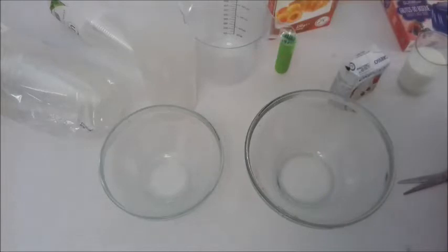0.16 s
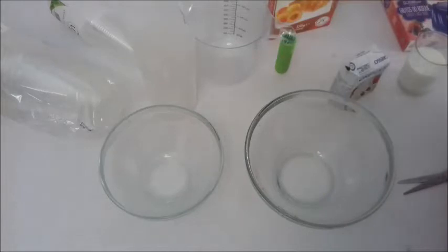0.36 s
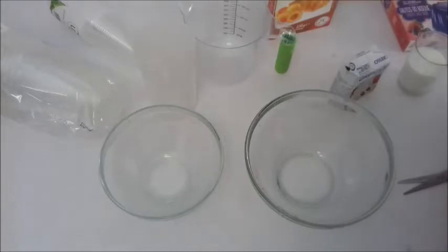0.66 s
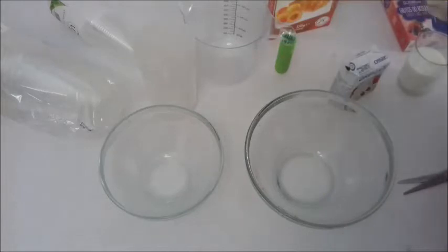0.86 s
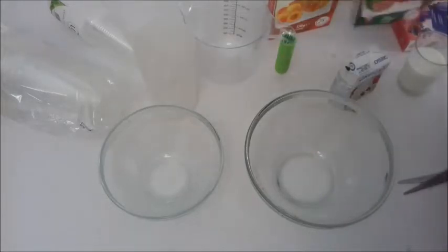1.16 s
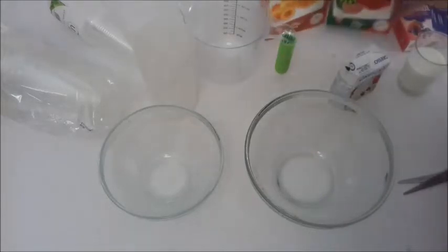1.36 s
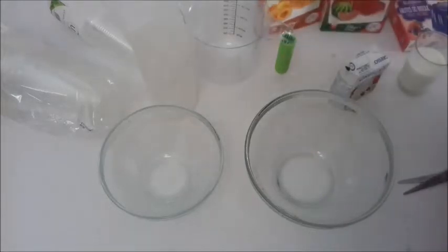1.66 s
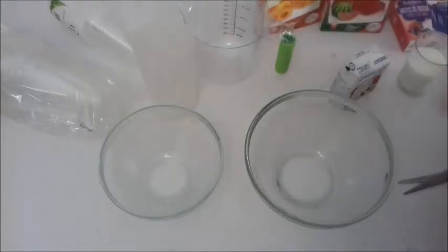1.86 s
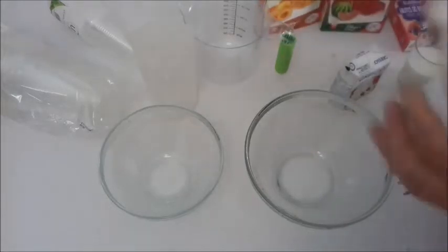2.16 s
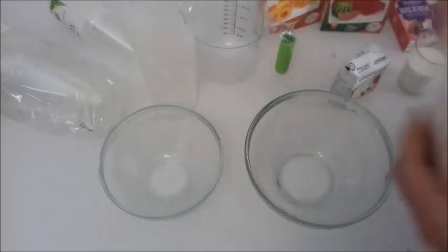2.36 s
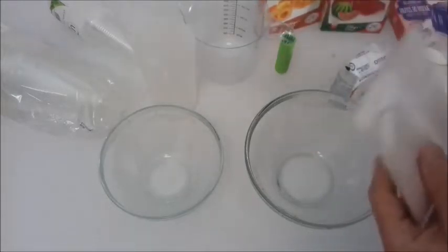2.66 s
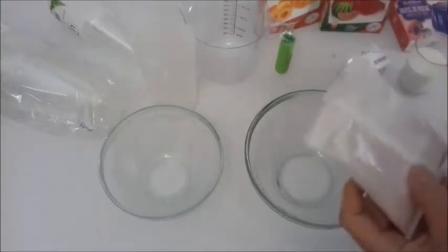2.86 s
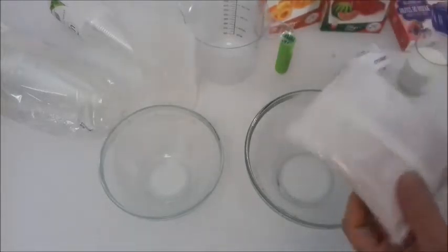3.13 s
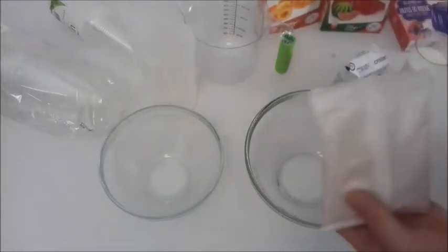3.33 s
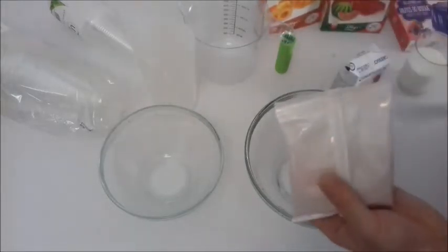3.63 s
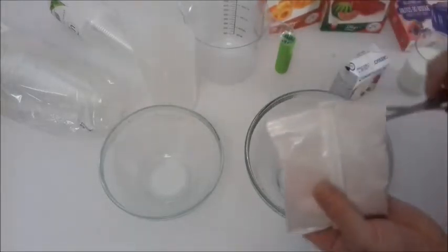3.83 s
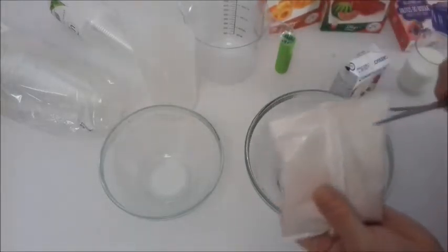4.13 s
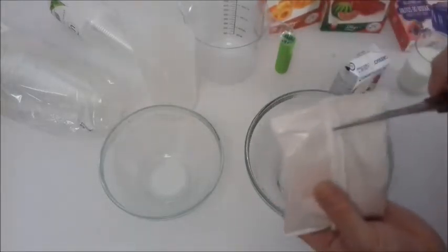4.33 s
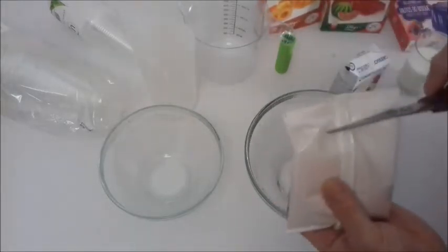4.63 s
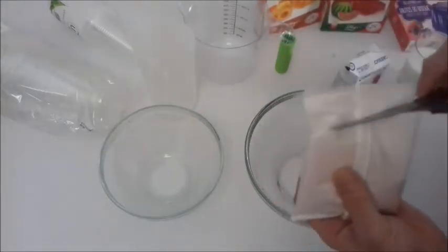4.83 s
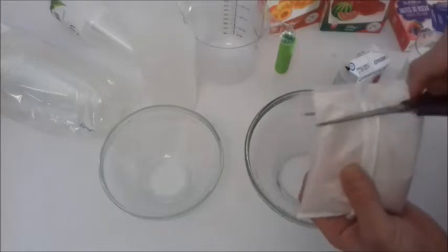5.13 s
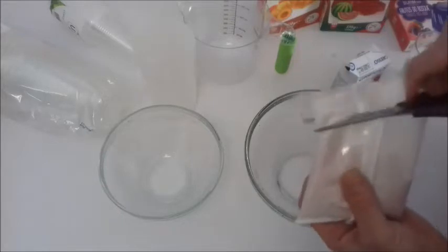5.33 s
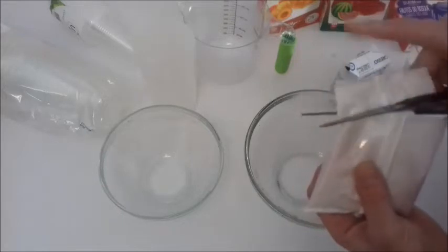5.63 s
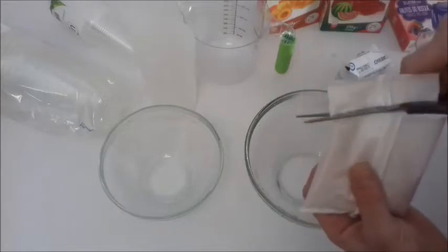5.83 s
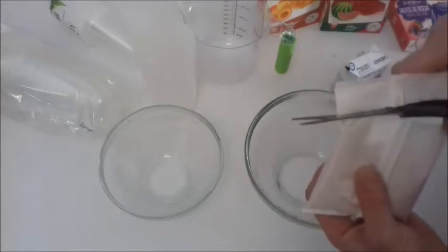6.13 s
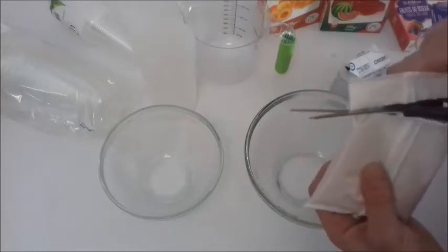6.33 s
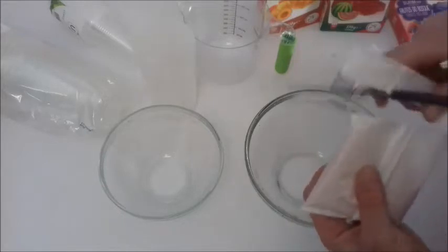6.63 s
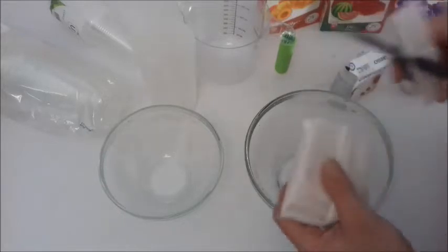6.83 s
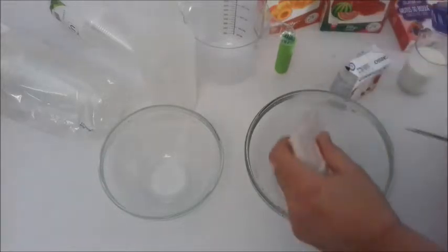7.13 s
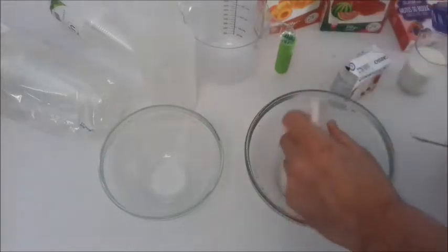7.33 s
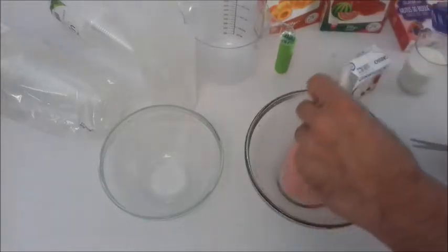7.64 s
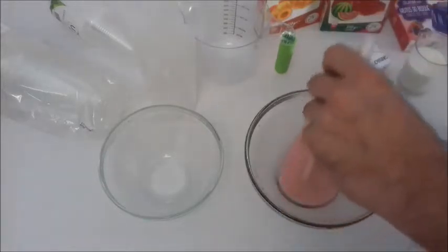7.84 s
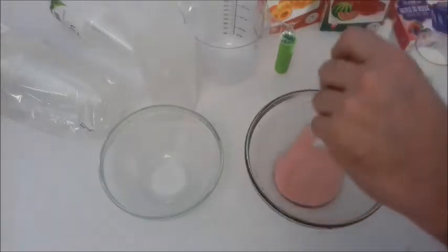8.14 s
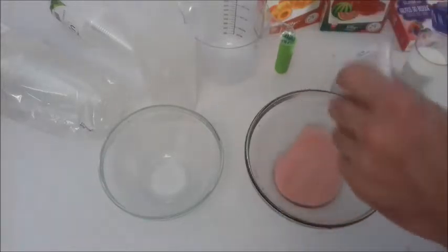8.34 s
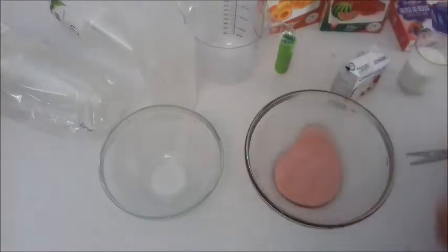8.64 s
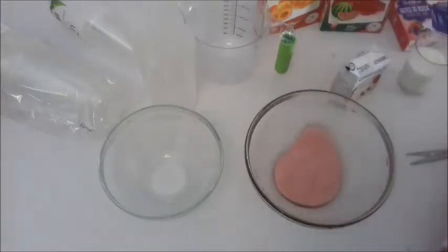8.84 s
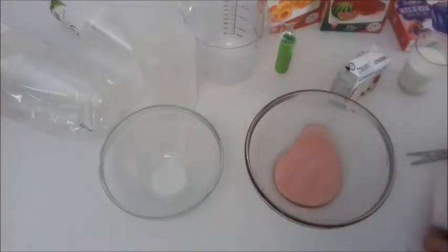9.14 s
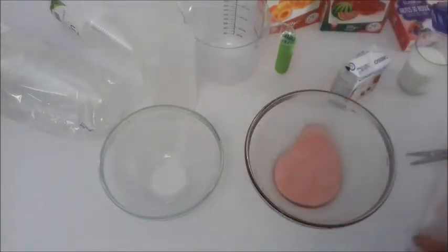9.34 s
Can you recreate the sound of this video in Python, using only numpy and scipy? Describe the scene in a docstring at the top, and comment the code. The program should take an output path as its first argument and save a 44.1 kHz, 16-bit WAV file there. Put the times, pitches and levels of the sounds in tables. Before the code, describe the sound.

A paper sachet crinkles and is snipped open with scissors, then powder hisses into a glass bowl over a faint appliance hum.

```python
"""A kitchen counter, an appliance humming in the room. A paper sachet is crumpled, snipped open with
scissors and emptied into a glass bowl. Creases snap over a bed of tiny crackles, the counter thuds
softly, powder hisses on the glass and the blades tick once. Walls and bowl answer the paper.
One small microphone with a strong 4 kHz resonance feeds both channels."""
import sys
import numpy as np
from scipy import signal
from scipy.fft import rfft, irfft, next_fast_len
from scipy.io import wavfile
from scipy.ndimage import uniform_filter1d, map_coordinates

SR = 44100
rng = np.random.default_rng(int(sys.argv[2]) if len(sys.argv) > 2 else 0)


def dump(signal):
    """Clip the signal to [-1, 1] and save it as 16-bit WAV at the path in sys.argv[1]."""
    limited = np.clip(np.atleast_2d(signal).T, -1, 1)
    pcm = np.round(limited * 32767).astype(np.int16)
    wavfile.write(sys.argv[1], SR, pcm)


N = 418509


def amp(db):
    """Decibels to gain."""
    return 10 ** (np.asarray(db) / 20)


def unit(x):
    """x scaled to rms 1."""
    return x / np.sqrt(np.mean(x ** 2) + 1e-20)


def unit_peak(rows):
    """Each row scaled to peak 1."""
    return rows / np.abs(rows).max(1, keepdims=True)


def unit_onset(rows):
    """Each row scaled to rms 1 over its first 8 ms."""
    return rows / np.sqrt(np.mean(rows[:, :SR // 125] ** 2, 1, keepdims=True))


def along(points, hz):
    """(f/Hz, value) points read at hz, on a log axis."""
    f, values = np.transpose(points)
    return np.interp(np.log(hz + 1), np.log(f + 1), values)


def curve(points):
    """(t/s, value) points joined into one value per sample."""
    return np.interp(np.arange(N) / SR, *np.transpose(points))


def wobble(rate):
    """A smooth random curve, rate knots a second."""
    knots = rng.standard_normal(int(N * rate / SR) + 4)
    return map_coordinates(knots, [np.arange(N) * rate / SR])


def filtered(x, response):
    """x through a response given as a function of frequency."""
    size = next_fast_len(N + SR // 2)
    return irfft(rfft(x, size) * response(np.fft.rfftfreq(size, 1 / SR)), size)[..., :N]


def coloured(x, spectrum, size=2048):
    """Rows of x through the minimum-phase filter with this (f/Hz, level/dB) spectrum."""
    gain = amp(along(spectrum, np.fft.rfftfreq(size, 1 / SR)))
    cepstrum = irfft(np.log(gain + 1e-6), size)
    cepstrum[1:size // 2] *= 2
    cepstrum[size // 2 + 1:] = 0
    pulse = irfft(np.exp(rfft(cepstrum)), size)
    return signal.fftconvolve(np.atleast_2d(x), pulse[None], axes=1)[:, :np.shape(x)[-1]]


def grains(per_s, spread_db, clump_db):
    """Random ticks: many small, a few large, in clumps."""
    hits = rng.random(N) < per_s / SR * amp(clump_db * wobble(35))
    return hits * rng.standard_normal(N) * amp(spread_db * np.minimum(rng.exponential(size=N), 3))


# The kitchen's air at the microphone: f/Hz, relative level/dB
ROOM_SPECTRUM = [(20, -12), (32, -27), (100, -15), (127, -14.5), (240, -12.5), (290, -6.5), (460, -7.5),
                 (850, -14.5), (2500, -20.5), (4200, -18.5), (5700, -38.5), (8000, -35.5), (16000, -45.5)]
# An appliance in the room: f/Hz, width/Hz, level/dB
HUM_BANDS = [(279.9, 9, -72.5), (380.5, 33, -67.5), (493, 14, -76), (556, 27, -82)]
# Rise and fall of the low tone near 380 Hz: room hum, and the bowl ringing as powder pours in:
# t/s, level change/dB
LOW_TONE_SWELL = [(0.0, 4), (1.5, 1), (1.8, 0.5), (3.09, -1), (3.3, 4.5), (4.26, -5.5), (4.84, 10.5),
                  (5.1, -5), (5.92, 3), (6.32, -3), (7.32, -3), (7.85, 8), (8.24, -4.5), (8.67, 0.5),
                  (9.49, -9)]


def room_tone(air_db=-66):
    """Steady air and the fuzzy hum bands of an appliance; the low tone near 380 Hz rises and falls."""
    air = filtered(rng.standard_normal(N), lambda hz: amp(along(ROOM_SPECTRUM, hz)))
    tones = []
    for centre, width, db in HUM_BANDS:
        band = filtered(rng.standard_normal(N), lambda hz: 1 / (1 + (2 * (hz - centre) / width) ** 2))
        tones.append(amp(db) * unit(band))
    tones[1] *= amp(curve(LOW_TONE_SWELL))
    return amp(air_db) * unit(air) + sum(tones)


# Fingers on the sachet: t/s, hold/s, crackle level/dB, body/dB and fizz/dB against the crackle
SQUEEZES = [(0, 0.038, -42, -2.5, -12), (.066, 0.065, -34.5, -6, -18), (0.175, 0.022, -35.5, -4.5, -17),
            (0.264, 0.022, -41, 2, -20), (0.272, 0.12, -36, -4.5, -15), (0.409, 0.033, -36.5, -3, -20),
            (0.439, 0.029, -28, -5, -14), (0.537, 0.066, -34, -6, -17.5), (0.636, 0.048, -26, -5, -12),
            (0.696, .03, -29.5, -2.5, -18), (0.767, 0.053, -33, -12, -12), (0.85, 0.035, -39.5, -4.5, -10),
            (.93, 0.25, -45.5, -2, -16.5), (1.293, 0.015, -31, -3, -22), (1.334, 0.058, -45.5, -1, -20),
            (1.405, .03, -34.5, -6.5, -14), (1.452, 0.061, -34.5, -10, -15), (1.516, .02, -33.5, -2, -17),
            (1.578, 0.014, -34, -0.5, -16), (1.653, 0.12, -48.5, -10, -12), (1.794, 0.028, -41, -7.5, -13),
            (1.987, .02, -48.5, 2, -16), (2.028, 0.039, -28, -6.5, -12.5), (2.126, 0.079, -41.5, -4, -15),
            (2.282, 0.076, -36, -9, -14), (2.381, .05, -36.5, -11, -9.5), (2.496, 0.16, -56, -11, -9.5),
            (2.752, 0.034, -36.5, -0.5, -16.5), (2.844, 0.044, -36, -5.5, -17),
            (2.99, 0.32, -52.5, -5.5, -13.5), (3.376, 0.05, -47, -12, -16), (3.429, 0.026, -52.5, 0.5, -18),
            (3.579, 0.034, -54.5, -4.5, -15), (3.695, .02, -58, -12, -26), (3.815, 0.014, -56.5, -11, -24),
            (3.864, 0.026, -41.5, -6.5, -18), (3.968, 0.083, -53.5, -6, -21),
            (4.353, 0.15, -52, -8.5, -13.5), (4.582, 0.047, -56.5, -9, -12), (4.66, 0.057, -45.5, -8, -15),
            (4.753, 0.013, -38, -7.5, -13), (4.864, .1, -49, -5.5, -10), (4.978, .04, -38, -7.5, -17),
            (5.018, 0.0099, -36, -5.5, -10), (5.153, 0.24, -43, -6, -13), (5.324, 0.0092, -40, -4.5, -9),
            (5.463, 0.036, -40.5, -5, -13), (5.52, 0.017, -44, -6, -18), (5.569, 0.042, -38.5, -11.5, -7.5),
            (5.665, 0.016, -34.5, -10.5, -15.5), (5.775, 0.15, -54.5, -5.5, -10),
            (5.886, 0.038, -42.5, -8, -14), (6.069, 0.16, -47, -7, -14), (6.346, 0.084, -60, -7, -28),
            (6.559, 0.063, -52.5, -9.5, -12), (8.143, 0.093, -62.5, -4, -26), (8.452, 0.022, -47, -2, -12),
            (8.567, .03, -45.5, 1.5, -24), (8.614, 0.016, -35, -6, -21), (8.675, 0.015, -42, -0.5, -24),
            (8.85, 0.026, -36, -5.5, -17), (8.924, 0.066, -46, -5.5, -15), (9.054, 0.21, -60.5, -4, -13),
            (9.332, 0.05, -52.5, -5, -17), (9.425, .08, -40, -13.5, -11)]


def squeezes(rise_db_per_s=1200, fall_db_per_s=187, hop=128):
    """Each squeeze bites fast, holds and lets go; their powers add. Gains of crackle, body and fizz."""
    start, hold, db, body_db, fizz_db = np.transpose(SQUEEZES)[:, :, None]
    t = np.arange(0, N + hop, hop) / SR
    before, after = np.maximum(start - t, 0), np.maximum(t - start - hold, 0)
    shape_db = db - rise_db_per_s * before - fall_db_per_s * after
    gains = [np.linalg.norm(amp(shape_db + band_db), axis=0) for band_db in (0, body_db, fizz_db)]
    return [np.interp(np.arange(N) / SR, t, gain) for gain in gains]


# Lower edges of the paper's four bands: f/Hz
BAND_EDGES = [220, 700, 2300, 6000]


def paper_bands(x):
    """The hollow, papery, crack and bright bands of x, low to high."""
    foot, low, mid, high = BAND_EDGES
    cuts = [([foot, low], "bandpass"), ([low, mid], "bandpass"), ([mid, high], "bandpass"),
            (high, "highpass")]
    return [signal.sosfilt(signal.butter(3, hz, kind, fs=SR, output="sos"), x) for hz, kind in cuts]


def patchy(x, depth_db):
    """Each small area of the sheet has its own pitch: short random patches of gain over frequency."""
    frames = signal.stft(x, nperseg=256)[2]
    patches = uniform_filter1d(rng.standard_normal(frames.shape), size=4, axis=0)
    patches = uniform_filter1d(patches, size=5, axis=1)
    return signal.istft(frames * amp(depth_db * unit(patches)), nperseg=256)[1][:N]


# Paper as the small microphone hears it, peaking near 4 kHz: f/Hz, relative level/dB
PAPER_SPECTRUM = [(120, -28.5), (300, -22.5), (600, -11.5), (1300, -8), (2600, -5), (3300, -1.5),
                  (3900, 4.5), (4600, -2.5), (5500, -13), (7000, -22.5), (8300, -26), (11500, -34.5),
                  (15600, -38)]


def crackle():
    """Bent paper ticks all over, on the soft rub of fingers."""
    level, body, fizz = squeezes()
    ticks = unit(grains(per_s=1500, spread_db=1.5, clump_db=2.5))
    rub = rng.standard_normal(N) * amp(2.5 * wobble(40))
    sheet = patchy(ticks + 1.7 * rub, depth_db=4.0)
    hollow, papery, crack, bright = paper_bands(coloured(sheet, PAPER_SPECTRUM)[0])
    return level * unit(crack) + body * unit(hollow + papery) + fizz * unit(bright)


# Creases and cuts: t/s, crack peak level/dB, panel f/Hz, panel level/dB, bright level/dB, decay/s
# Panel and bright levels are rms over the first 8 ms, against the crack's peak.
CREASES = [(0.0235, -26.5, 870, -14, -42, 0.0013), (0.061, -28.5, 1380, -12, -40, 0.0016),
           (0.0742, -22, 1340, -27, -30, 0.0013), (0.0815, -19, 912, -17.5, -30, 0.0012),
           (0.1004, -17.5, 1420, -26, -31, 0.0023), (0.1135, -11.5, 1470, -19, -25, 0.0019),
           (0.193, -19.5, 1330, -17, -34, 0.00079), (0.2485, -32, 970, -1.5, -28.5, 0.00088),
           (0.281, -19, 1730, -21, -32, 0.0017), (0.297, -17.5, 2480, -12, -29, 0.00065),
           (0.3083, -18, 1270, -15, -19, 0.00088), (0.3725, -23.5, 990, -13.5, -14.5, 0.0012),
           (0.4506, -22, 1700, -24, -11.5, 0.0016), (0.4617, -16.5, 1410, -28, -29.5, 0.0026),
           (0.5324, -12, 1410, -24.5, -33, 0.0023), (0.5634, -26.5, 1180, -12, -33, 0.00095),
           (0.5955, -21, 1500, -20.5, -20, 0.0018), (0.641, -16.5, 1560, -7, -42, 0.0019),
           (0.6553, -18.5, 1550, -21, -28, 0.0013), (0.666, -21, 1520, -17, -19, 0.0013),
           (0.686, -19.5, 1300, -10, -10, 0.0011), (0.69, -18.5, 2080, -25, -27, 0.0015),
           (0.7034, -19, 1340, -3.5, -32, 0.0025), (0.748, -17.5, 1400, -16.5, -20, 0.0014),
           (0.7914, -10.5, 1580, -21, -20, 0.0026), (0.8294, -34, 2130, -26, -16, 0.0013),
           (0.8658, -22, 850, -10, -20, 0.002), (0.882, -24, 2050, -29, -32, 0.0011),
           (0.9308, -34, 1590, -15.5, -14, 0.0016), (0.948, -44, 1830, -9, -22, 0.0022),
           (1.017, -35, 1230, -0.5, -35, 0.0022), (1.208, -30.5, 2150, -13, -30, 0.001),
           (1.26, -33, 2360, -7.5, -18, 0.00077), (1.2882, -22.5, 2380, -2.5, -13.5, 0.00053),
           (1.2973, -19, 1300, -5, -25, 0.0012), (1.321, -17.5, 1530, -39, -29, 0.0016),
           (1.377, -22, 1680, -25, -18.5, 0.0013), (1.397, -26, 1440, -18, -18, 0.0014),
           (1.4202, -22, 790, -18, -23, 0.0018), (1.453, -14, 2440, -19, -27, 0.0013),
           (1.4653, -8.5, 2050, -16, -25, 0.00074), (1.4813, -14.5, 2090, -19, -19, 0.0016),
           (1.515, -12.5, 1700, -11, -23, 0.0017), (1.5694, -25.5, 2830, 4, -30, 0.0013),
           (1.589, -20, 1530, -17, -33, 0.0012), (1.7928, -28.5, 1246, -22, -25, 0.0013),
           (1.8044, -27.5, 1560, -15.5, -19.5, 0.0016), (1.9286, -29.5, 2520, -14, -28, 0.00092),
           (2.0057, -21.5, 1710, -14.5, -13.5, 0.002), (2.026, -17.5, 2230, -8.5, -38, 0.0039),
           (2.04, -10.5, 2110, -19.5, -24, 0.0011), (2.0647, -12.5, 1740, -11, -31, 0.0018),
           (2.079, -12.5, 1750, -22.5, -26, 0.0015), (2.112, -18.5, 1020, -11, -36, 0.0039),
           (2.128, -15.5, 2020, -16, -26, 0.0016), (2.1853, -14, 2580, -16.5, -24.5, 0.00069),
           (2.272, -31, 2560, -12, -25, 0.0016), (2.287, -24.5, 1350, -35, -23, 0.0015),
           (2.33, -27.5, 2240, -35, -28, 0.0013), (2.347, -16.5, 1640, -16, -18, 0.0019),
           (2.379, -11, 1190, -21.5, -21.5, 0.00076), (2.4044, -17.5, 2510, -13.5, -20, 0.0021),
           (2.7464, -27.5, 1150, -16, -30, 0.0009), (2.7731, -54, 2660, -13, -31, 0.0014),
           (2.8416, -23, 2660, -10.5, -19.5, 0.0023), (2.8547, -33, 2150, -9, -22, 0.0017),
           (2.874, -37, 1460, -15, -27, 0.0015), (2.9237, -29.5, 1330, -13, -29, 0.0011),
           (2.993, -36, 2180, -16, -22, 0.0013), (3.0744, -31, 1370, -6.5, -22, 0.0026),
           (3.174, -42, 1900, -11.5, -35, 0.0015), (3.186, -38, 2300, -1.5, -37, 0.0017),
           (3.2284, -32.5, 1670, -8.5, -31, 0.0033), (3.3383, -37, 1650, -10, -30, 0.0017),
           (3.3814, -21.5, 1440, -37, -20, 0.0012), (3.4668, -30, 2310, -7, -30, 0.0031),
           (3.6067, -38.5, 1330, -10, -31, 0.0014), (3.694, -24.5, 1270, -24.5, -35, 0.0014),
           (3.857, -19.5, 1130, -20.5, -37, 0.0026), (3.8826, -23.5, 2180, -8.5, -23, 0.0039),
           (3.9649, -18.5, 1700, -24.5, -35, 0.0029), (4.047, -45, 1260, 2.5, -26, 0.0025),
           (4.097, -37.5, 1770, -13, -33, 0.0012), (4.3798, -29, 1770, -9.5, -41, 0.0016),
           (4.4428, -23, 1710, -18.5, -30, 0.0016), (4.4685, -33, 2240, -7.5, -29, 0.00092),
           (4.579, -38, 2760, -6.5, -16, 0.0029), (4.602, -28, 1690, -19, -32, 0.0016),
           (4.678, -32, 2600, -9, -16, 0.0013), (4.7044, -28, 1760, -12.5, -22, 0.001),
           (4.7569, -16, 1820, -10.5, -22, 0.0018), (4.79, -34.5, 1730, -4, -12, 0.0018),
           (4.8973, -26, 2200, -18, -14, 0.0015), (4.979, -36.5, 2240, -8, -31, 0.0011),
           (5.0024, -29.5, 1640, -5.5, -20, 0.0014), (5.0298, -20, 2070, -5.5, -20.5, 0.0012),
           (5.1447, -27, 2460, -15, -19, 0.0013), (5.1567, -15.5, 1460, -22, -22.5, 0.0025),
           (5.2204, -36, 2590, -20, -30, 0.0018), (5.2709, -25.5, 2600, -9, -23, 0.0019),
           (5.2876, -21, 2380, -9.5, -29, 0.00092), (5.2996, -26, 2180, -13.5, -28, 0.0012),
           (5.3557, -13.5, 2680, -18, -31, 0.0011), (5.442, -13.5, 2840, -17.5, -26.5, 0.0034),
           (5.472, -26, 1770, -8, -18, 0.0039), (5.524, -20.5, 2590, -11, -31.5, 0.00092),
           (5.533, -32, 2570, -12, -20, 0.0015), (5.5645, -10, 2750, -17.5, -19, 0.0027),
           (5.6705, -15, 2480, -11, -21, 0.0025), (5.7912, -19, 2620, -15.5, -24, 0.0013),
           (5.8925, -26.5, 2570, -24, -20, 0.0006), (5.9474, -20.5, 1760, -19.5, -24.5, 0.00075),
           (5.9544, -23, 2460, -7.5, -22, 0.0023), (6.0415, -27.5, 1760, -26, -26, 0.00072),
           (6.106, -33, 2290, -9.5, -33, 0.0011), (6.1583, -27.5, 2500, -10, -31, 0.002),
           (6.2003, -23.5, 2160, -23, -24.5, 0.0013), (6.2134, -29, 2050, -17, -28.5, 0.00071),
           (6.264, -34, 2590, -15, -21, 0.0021), (6.5762, -28, 1110, -21, -19, 0.0015),
           (6.627, -32.5, 1720, -16, -20, 0.0019), (6.8654, -40.5, 1860, -11.5, -28, 0.00099),
           (8.1433, -31, 1410, -22, -25, 0.0014), (8.2362, -43, 1800, -17, -33, 0.0013),
           (8.269, -55, 2130, 4, -31, 0.0009), (8.4343, -39, 2570, -22, -6.5, 0.0017),
           (8.573, -34, 1810, -15, -18, 0.0015), (8.6053, -12, 1870, -20, -29.5, 0.0036),
           (8.6725, -20.5, 1740, -8.5, -37, 0.00068), (8.778, -36.5, 1700, -0.5, -23, 0.0008),
           (8.8295, -34, 1970, -2, -21, 0.0018), (8.856, -17.5, 2450, -8, -15.5, 0.0018),
           (8.913, -32, 2120, -1.5, -39, 0.0011), (8.927, -26.5, 2160, -9.5, -36, 0.0013),
           (8.978, -45, 2200, -1, -32, 0.0013), (9.074, -26.5, 1180, -30.5, -27, 0.00072),
           (9.338, -37.5, 1650, -15.5, -23, 0.00085), (9.3804, -47, 1850, 0, -33, 0.0017),
           (9.387, -47, 1790, 2.5, -23, 0.0022), (9.42, -33.5, 2070, -13, -33, 0.002)]


def snaps(panel_q=5.5):
    """A crease buckles in a millisecond or so and rings the freed panel; the sheet rustles, settling."""
    start, db, hz, panel_db, bright_db, decay = np.transpose(CREASES)[:, :, None]
    t = np.arange(2048) / SR
    fine, uneven, noise = np.moveaxis(rng.standard_normal((len(start), 3, len(t))), 1, 0)
    burst = noise * (1 - np.exp(-t / 0.00026)) * np.exp(-t / decay)
    ticks = fine * amp(5.3 * uneven)
    rustle_share = 0.5 * amp(-14.5 - 0.22 * (db + 22.5))  # smaller for a harder crack
    rustle = rustle_share * t / 0.0069 * np.exp(-t / 0.0065) * ticks
    source = coloured(burst + rustle, PAPER_SPECTRUM)
    hollow, papery, crack, bright = paper_bands(source)
    ring = np.exp(-np.pi * hz / panel_q * t) * np.cos(2 * np.pi * hz * t)
    ringing = signal.fftconvolve(source, ring, axes=1)[:, :len(t)]
    panel = unit_peak(ringing) + 0.32 * unit_peak(papery)
    hollow_db = -12.5 - 9 * np.log2(hz / 1500)  # large, low panels sound more hollow
    body = unit_onset(panel) + amp(hollow_db) * unit_onset(hollow)
    snap = amp(db) * (unit_peak(crack) + amp(panel_db) * body + amp(bright_db) * unit_onset(bright))
    at = np.round(start * SR).astype(int) + np.arange(len(t))
    return np.bincount(at.ravel(), snap.ravel(), N + len(t))[:N]


# Counter, bowl and tiles, a short way from the microphone: delay/s, level/dB
ECHOES = [(.0027, -33.5), (.0048, -27), (.009, -27), (0.0169, -33.5)]
# The kitchen walls, farther off: f/Hz, t60/s
WALL_DECAY = [(300, 0.68), (800, 0.34), (2000, 0.24), (5500, 0.26), (14000, 0.24)]


def walls(x, wet_db, predelay_samples=150):
    """Near surfaces echo, then a tail dies by band; each quarter second gets its own random tail."""
    reverb, step = np.zeros(N + 2 * SR), SR // 4
    for start in range(0, N, step):
        hz, t, frames = signal.stft(rng.standard_normal(SR // 2), SR, nperseg=256)
        fade = amp(-60 * t / along(WALL_DECAY, hz)[:, None])
        tail = signal.istft(frames * fade, SR, nperseg=256)[1]
        wet = signal.fftconvolve(x[start:start + step], amp(wet_db) * tail / np.linalg.norm(tail))
        reverb[start + predelay_samples:][:len(wet)] += wet
    echoes = sum(amp(db) * np.pad(x, (round(delay * SR), 0))[:N] for delay, db in ECHOES)
    return x + echoes + reverb[:N]


# Pushes on the counter: t/s, peak level/dB, f/Hz, rise/s
PUSHES = [(0.184, -56, 171, 0.032), (0.638, -62, 150, 0.033), (1.544, -58, 130, 0.027),
          (2.794, -58, 131.4, 0.03), (4.98, -66, 179, 0.049), (5.668, -65, 152, 0.031),
          (8.581, -68, 134, 0.035)]


def counter_thuds():
    """Softly pushed, the counter top swells and fades at a low, unsteady pitch."""
    out, t = np.zeros(N + SR), np.arange(SR // 2) / SR
    phase_drift = 1.6 * np.pad(wobble(44), (0, SR))
    for start, db, hz, rise in PUSHES:
        at = round(start * SR)
        swell = t / rise * np.exp(1 - t / rise)
        out[at:][:len(t)] += amp(db) * swell * np.sin(2 * np.pi * hz * t + phase_drift[at:][:len(t)])
    return out[:N]


# Resonances of the air in the glass bowl: f/Hz, width/Hz, level/dB
BOWL_MODES = [(400, 61, 7), (1167, 40, -1.5), (1728, 96, -3)]
# How near the sachet is held to the bowl: t/s, share (0 away, 1 right over it)
BOWL_NEARNESS = [(0, 0), (2.8, 0.07), (3.3, 1), (6.3, 0.76), (7, 1), (8.3, 1), (8.6, 0.07)]


def bowl(x):
    """Sound made over the bowl sets the air in it ringing."""
    def resonances(hz):
        return sum(amp(db) * 1j * hz * width / (centre ** 2 - hz ** 2 + 1j * hz * width)
                   for centre, width, db in BOWL_MODES)
    return filtered(curve(BOWL_NEARNESS) * x, resonances)


# The stream falling into the bowl: t/s, level/dB
POUR_LEVEL = [(6.8, -68.5), (7.03, -58), (7.1, -50), (7.17, -50), (7.38, -37), (7.5, -40.5), (7.87, -44.5),
              (7.95, -50.5), (8.05, -75)]
# Powder on glass, at the microphone: f/Hz, relative level/dB
POWDER_SPECTRUM = [(500, -47), (1000, -22), (2200, -12.5), (3300, -8), (4150, -1.5), (4900, -10),
                   (6000, -18), (8000, -26), (15500, -38)]


def powder(silent_db=-110):
    """Thousands of fine crystals a second strike the glass."""
    db = curve([(6.6, silent_db), *POUR_LEVEL, (8.2, silent_db)])
    impacts = grains(per_s=8000, spread_db=1.0, clump_db=0.5)
    return amp(db) * unit(coloured(impacts, POWDER_SPECTRUM)[0])


# The scissors touch something hard: t/s, level/dB
TOUCHES = [(8.4348, -36.5)]
# Modes of the steel blades: f/Hz, level/dB against the touch, t60/s
BLADE_MODES = [(1660, -10.5, 0.042), (2600, 3, 0.046), (3210, 3, .03)]


def scissors():
    """A touch rings the blades briefly."""
    out, t = np.zeros(N + SR), np.arange(SR // 4) / SR
    ring = sum(amp(db - 60 * t / t60) * np.sin(2 * np.pi * hz * t) for hz, db, t60 in BLADE_MODES)
    for start, db in TOUCHES:
        out[round(start * SR):][:len(t)] += amp(db) * ring
    return out[:N]


def scene():
    """The counter from one microphone: the same sound in both channels."""
    handling = walls(crackle() + snaps() + scissors(), wet_db=-11.0)
    handling = filtered(handling, lambda hz: hz ** 2 / (hz ** 2 + 70 ** 2))  # small sheets: no deep bass
    mono = room_tone() + handling + counter_thuds() + bowl(handling) + powder()
    return np.tile(mono, (2, 1))


# Each channel's own hiss: f/Hz, relative level/dB
HISS_SPECTRUM = [(60, -16), (200, -4), (550, 0), (1700, -1), (4200, -5), (8000, -11), (15000, -12)]


def record(dry, hiss_db=-70.5, top_hz=15800, dc_offset=-0.0006):
    """Each channel adds faint hiss and a tiny offset; nothing is kept above the band limit."""
    hiss = filtered(rng.standard_normal((2, N)), lambda hz: amp(along(HISS_SPECTRUM, hz)))
    return filtered(dry + amp(hiss_db) * unit(hiss), lambda hz: hz < top_hz) + dc_offset


dry = scene()
out = record(dry)
dump(out)
```